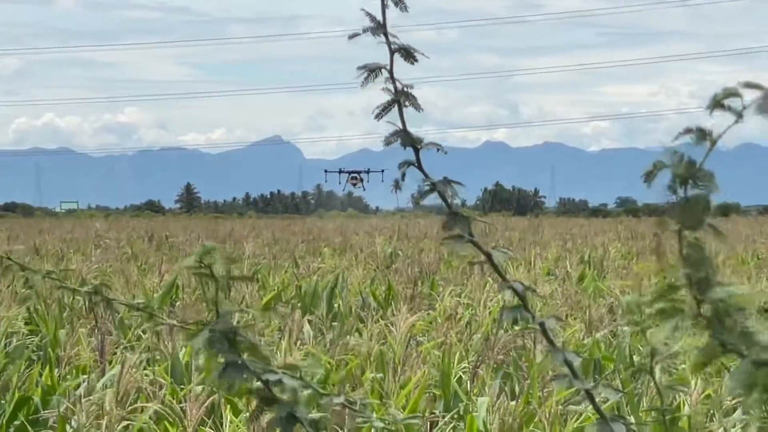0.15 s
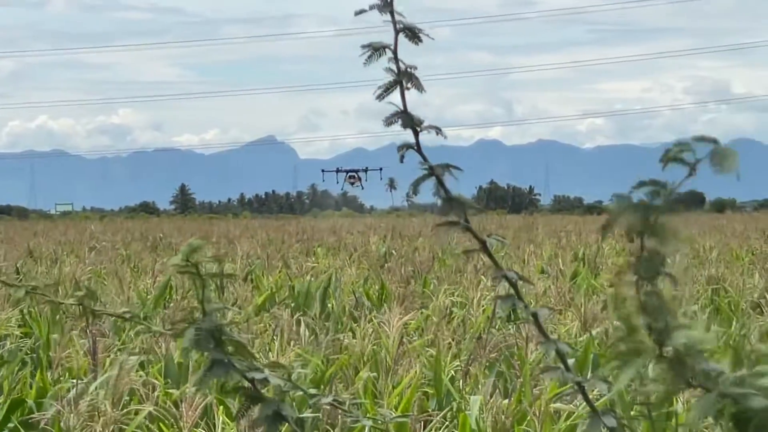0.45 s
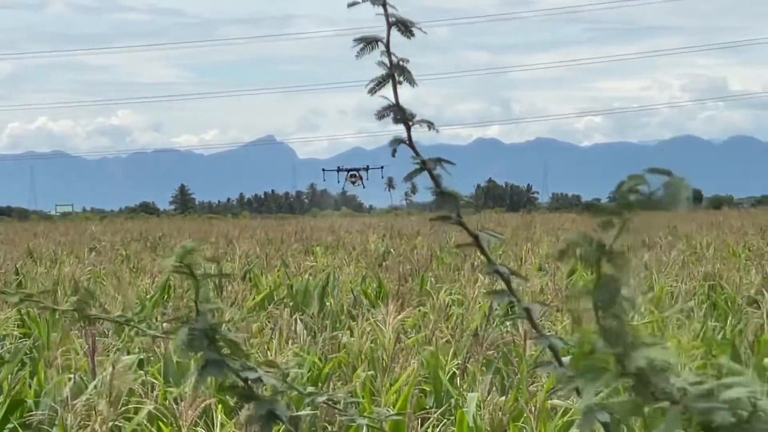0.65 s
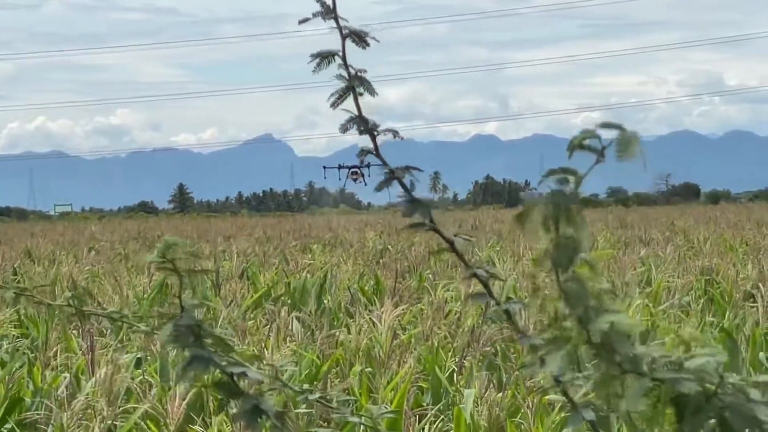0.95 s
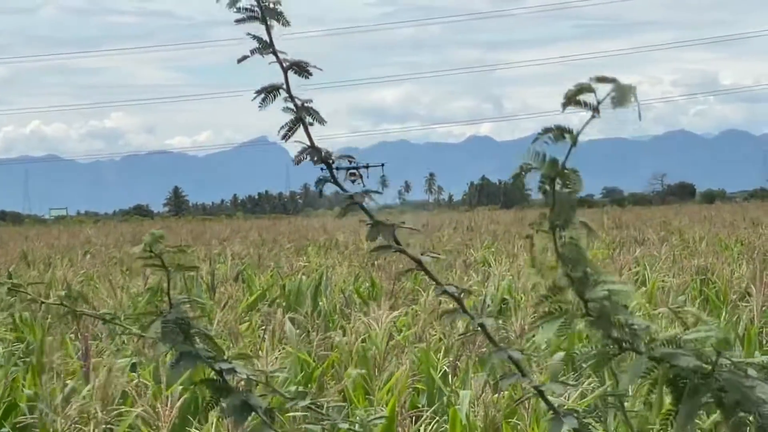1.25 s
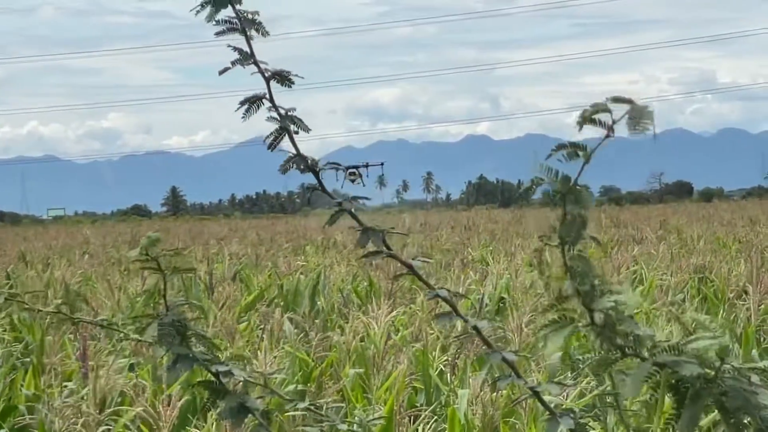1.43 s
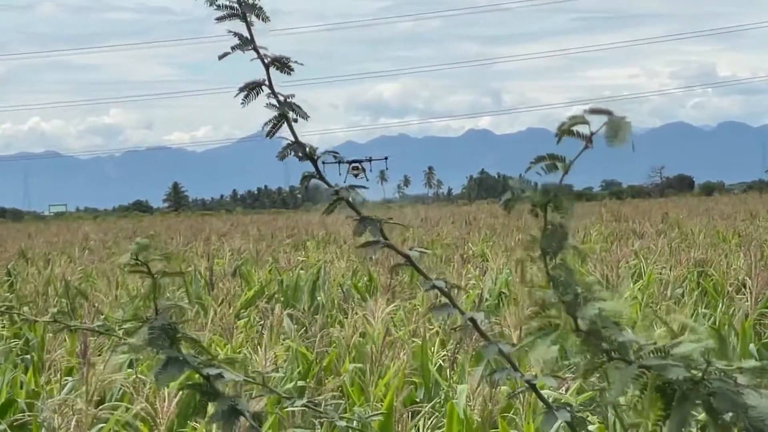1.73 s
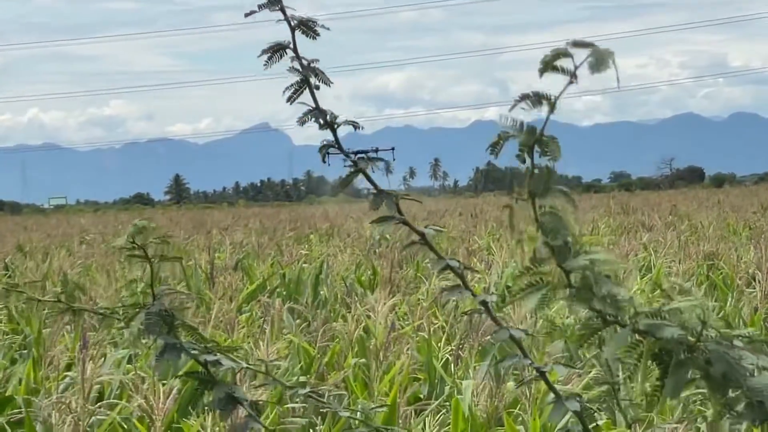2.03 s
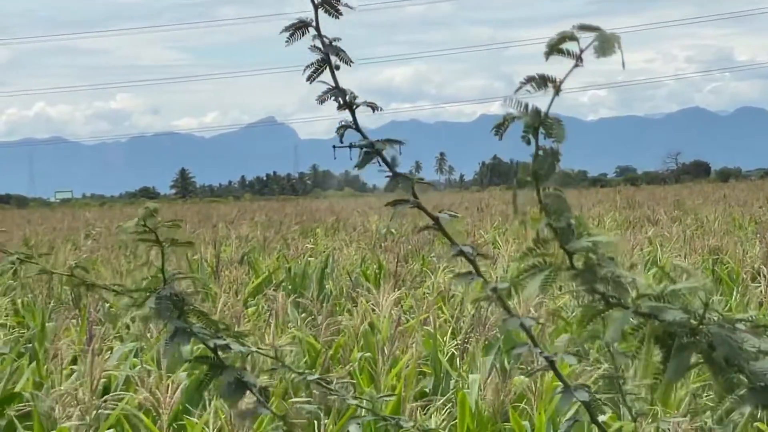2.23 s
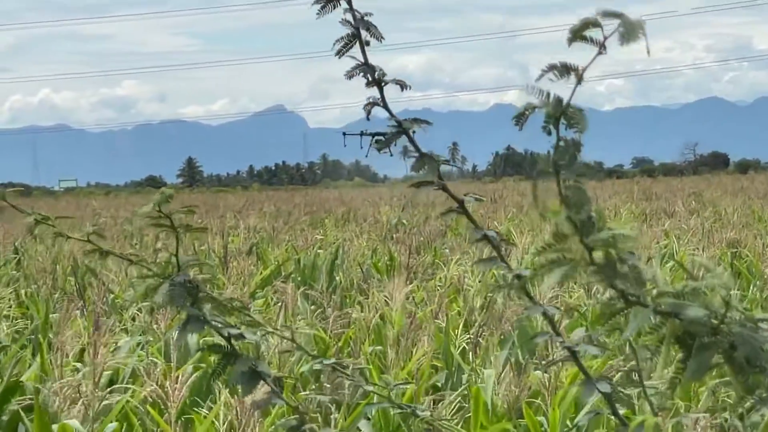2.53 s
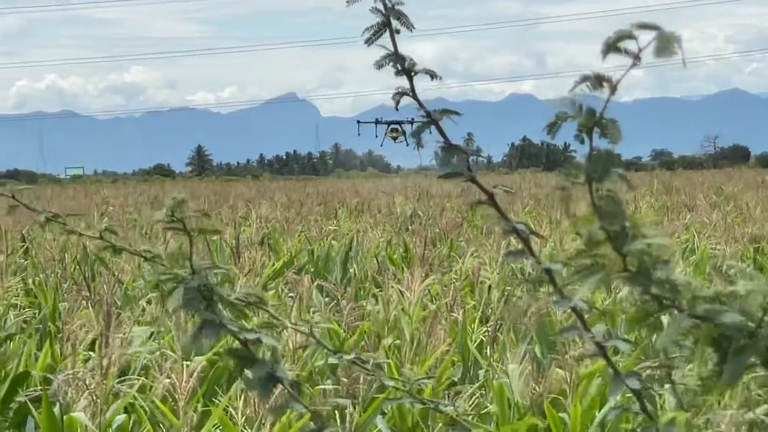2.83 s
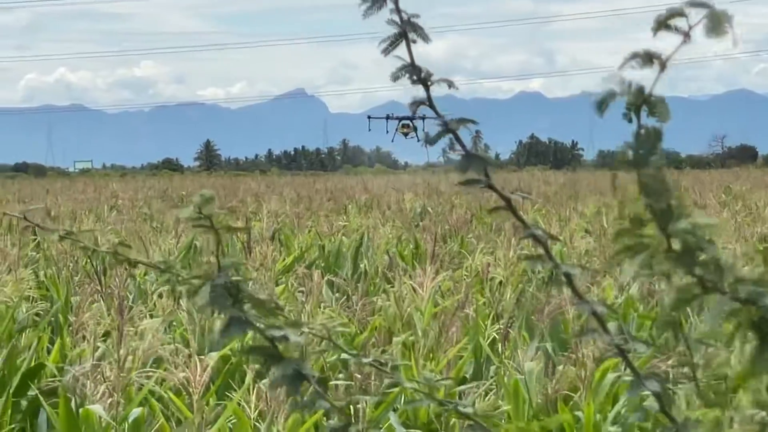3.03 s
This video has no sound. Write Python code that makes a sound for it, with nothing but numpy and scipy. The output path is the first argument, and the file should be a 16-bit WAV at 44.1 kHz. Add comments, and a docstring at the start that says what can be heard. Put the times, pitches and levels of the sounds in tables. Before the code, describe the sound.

A three-cylinder diesel, probably a tractor, idles steadily nearby with hum, chuffs and knocks; wind thumps the microphone, then drops. Faint bird slurs come early, over hissing crop leaves and soft distant drone wash outdoors.

```python
"""Idling diesel at the edge of a crop field

A spraying drone hovers far off, a soft rotor wash of fluttering low noise; the crop's leaves hiss.
A small bird calls faintly in gliding tones, and bursts of low noise buffet the microphone, then drop.
Nearby a three-cylinder diesel, probably a tractor, idles: noise that partly repeats with each engine
cycle and steady tones make its hum, uneven chuffs, clatter and knocks."""
import sys
import numpy as np
from scipy import signal
from scipy.fft import rfft, irfft
from scipy.io import wavfile
from scipy.ndimage import uniform_filter1d

SR = 44100
rng = np.random.default_rng(int(sys.argv[2]) if len(sys.argv) > 2 else 0)


def unload_wav(signal):
    """Save mono or channel-first audio to the path in sys.argv[1] as 16-bit WAV at rate SR, clipped to [-1, 1]."""
    wavfile.write(
        sys.argv[1],
        SR,
        np.round(np.clip(np.atleast_2d(signal).T, -1, 1) * 32767).astype(np.int16),
    )


N = 140238

CYCLE_HZ = 5.096  # engine cycles a second; each of the three cylinders fires once a cycle
EXHAUST_REPEATS = 0.4  # share of the puff and knock noise power that returns every cycle


def from_db(db):
    """Decibels to gain."""
    return 10 ** (np.asarray(db) / 20)


def rms_one(x):
    """Scale to rms 1."""
    return x / np.sqrt(np.mean(x ** 2) + 1e-20)


def seconds():
    """Time of every sample."""
    return np.arange(N) / SR


def in_time(rows):
    """A curve joined by straight lines."""
    return np.interp(seconds(), *np.transpose(rows))


def bins():
    """Frequency of every spectral bin [Hz], at least 1 so that its logarithm exists."""
    return np.maximum(np.arange(N // 2 + 1) * SR / N, 1)


def at_hz(points, hz):
    """Read a table on a log-frequency axis."""
    f, value = np.transpose(points)
    return np.interp(np.log(hz), np.log(f), value)


def colour(x, spectrum, centre_hz=1):
    """Give noise a spectrum; rms 1."""
    gain = from_db(at_hz(spectrum, bins() / centre_hz))
    return rms_one(irfft(rfft(x) * gain, N))


def stereo_noise(likeness):
    """White noise, partly shared by both channels; the likeness may vary with frequency."""
    mid, side = rfft(rng.standard_normal((2, N)))
    c = np.clip(likeness, 0, 1)
    return irfft(np.sqrt(1 + c) * mid + np.sqrt(1 - c) * side * [[1], [-1]], N)


def cyclic_noise(repeats):
    """White noise of which a share of the power comes back with every engine cycle."""
    share = np.clip(repeats, 0, 1)
    one_cycle = rng.standard_normal(int(SR / CYCLE_HZ))
    fresh = rng.standard_normal(N)
    return np.sqrt(share) * np.resize(one_cycle, N) + np.sqrt(1 - share) * fresh


def even(x, span_s):
    """Noise with its chance swells evened out."""
    power = np.mean(np.atleast_2d(x) ** 2, axis=0)
    width = max(int(span_s * SR), 2)
    smooth_power = uniform_filter1d(uniform_filter1d(power, width), width)
    return x / np.sqrt(smooth_power + 1e-12)


def flicker(count):
    """A random wobble with so many turns a second; rms 1."""
    turns = rng.standard_normal(int(count * N / SR) + 2)
    return rms_one(np.interp(seconds() * count, np.arange(len(turns)), turns))


def resonate(x, hz, width_hz):
    """One resonance, a pole pair whose radius sets the ringing; rms 1."""
    r = np.exp(-np.pi * width_hz / SR)
    poles = [1, -2 * r * np.cos(2 * np.pi * hz / SR), r * r]
    return rms_one(signal.lfilter([1, 0, -1], poles, x))


def stroke(start_s, rate, attack_s, hold_s, decay_s):
    """A repeating attack, hold and decay, with the tail of the stroke before."""
    age = (seconds() - start_s) % (1 / rate)

    def shape(a):
        return np.minimum(a / attack_s, 1) * np.exp(-np.maximum(a - hold_s, 0) / decay_s)

    return np.hypot(shape(age), shape(age + 1 / rate))


def rotor_wash():
    """The drone is so far off that only a soft, fluttering rush remains."""
    # far rotor rush: (frequency [Hz], relative density [dB])
    wash_spectrum = [(30, -17), (60, -8.5), (110, 1.5), (220, 2), (330, -8), (460, -7), (700, -20),
                     (1200, -25.5), (2000, -31.5), (4000, -47.5), (10000, -116)]
    level_db, flutter_db = -35, 0.9
    flutter = flutter_db * (flicker(count=9) + flicker(count=35))
    return from_db(level_db + flutter) * colour(stereo_noise(likeness=0.72), wash_spectrum)


def leaves():
    """The crop hisses in the breeze: bright noise with a flickering level."""
    # leaf hiss: (frequency [Hz], relative density [dB])
    leaf_spectrum = [(400, -33), (1000, 8), (1700, 7), (2300, 2), (3700, 0.5), (4400, -3.5), (6200, -6),
                     (8000, -5), (9700, -3.5), (11000, -2), (11700, -18.5)]
    # mean loudness of the hiss: (time [s], level [dB])
    leaf_level = [(0, -50.5), (.7, -53), (1.4, -52), (2.4, -51.5), (2.9, -51), (3.18, -50)]
    # how alike the hiss starts out left and right: (frequency [Hz], likeness [0 to 1])
    leaf_likeness = [(700, 0.41), (1700, 0.71), (2200, 0.64), (3200, 0.84), (4600, 0.99), (5400, 1)]
    flicker_db = 0.69
    level_db = in_time(leaf_level) + flicker_db * (flicker(count=8) + flicker(count=30))
    return from_db(level_db) * colour(stereo_noise(at_hz(leaf_likeness, bins())), leaf_spectrum)


def bird():
    """Thin, quick slurs gliding in pitch, with a little scattering in the crop."""
    # slurs: (start [s], length [s], first pitch [Hz], last pitch [Hz], level before the trim [dB])
    slurs = [(.325, .04, 3950, 4300, -59), (.362, .026, 4950, 4300, -58), (.415, .075, 4200, 5600, -59.5),
             (.482, .03, 5750, 6550, -55.5), (.665, .028, 4020, 4280, -61), (.697, .024, 4850, 4330, -57),
             (.765, .085, 4500, 6350, -60), (.99, .05, 3850, 4250, -58.5), (1.042, .025, 4950, 4400, -59),
             (1.105, .09, 4250, 6400, -61), (1.455, .055, 4920, 5150, -58), (1.495, .04, 5700, 6400, -60.5),
             (1.525, .025, 5050, 4900, -60)]
    trim_db, scatter_decay_s, scatter_db = -6.5, 0.009, -1
    direct = np.zeros(N)
    for start_s, length_s, from_hz, to_hz, db in slurs:
        u = np.clip((seconds() - start_s) / length_s, 0, 1)  # progress through the slur
        swell = np.sqrt(8 * u * (1 - u))  # silent at both ends
        pitch_hz = from_hz * (to_hz / from_hz) ** u
        direct += from_db(db) * swell * np.sin(2 * np.pi * np.cumsum(pitch_hz) / SR)
    scatter = rng.standard_normal(N) * np.exp(-seconds() / scatter_decay_s)
    scattered = signal.fftconvolve(direct, scatter / np.linalg.norm(scatter))[:N]
    return from_db(trim_db) * (direct + from_db(scatter_db) * scattered)


def wind():
    """Low turbulence on the microphone, with short buffets on top."""
    # underlying wind: (time [s], level [dB])
    wind_level = [(0, -20.5), (.15, -33), (.38, -28.5), (.55, -29), (.8, -26.5), (1.05, -29), (1.3, -28.5),
                  (1.45, -22.5), (1.7, -28.5), (1.9, -24.5), (2.0, -27.5), (2.2, -33.5), (2.35, -42),
                  (2.6, -48), (2.88, -44), (3.0, -39), (3.18, -42)]
    # its rumble: (frequency [Hz], relative density [dB])
    rumble_spectrum = [(15, -35), (25, -26), (40, -6), (55, 3), (75, 6.5), (95, -3.5), (125, -1.5),
                       (190, -8.5), (280, -19), (450, -34.5), (800, -51.5), (2000, -71), (8000, -100)]
    # single buffets: (peak time [s], peak level [dB], Gaussian half length [s], centre frequency [Hz])
    buffets = [(0.185, -19.5, 0.02, 73), (0.261, -26, 0.0064, 190), (0.287, -18.5, 0.029, 65),
               (0.47, -18.5, 0.0069, 82.3), (0.538, -22.5, 0.02, 100), (0.601, -20, 0.011, 99.3),
               (1.366, -22, 0.014, 102), (1.391, -15.5, 0.017, 77.5), (1.469, -15, 0.0081, 87),
               (1.494, -14, 0.0074, 77.5), (1.536, -19, 0.027, 69.4), (1.638, -14, 0.0086, 75.5),
               (1.743, -27.5, 0.0049, 308), (1.761, -17, 0.011, 53.3), (1.788, -28, 0.019, 174),
               (1.827, -23.5, 0.0052, 296), (2.075, -16, 0.02, 83), (2.088, -23.5, 0.0057, 292),
               (2.14, -19.5, 0.011, 91), (2.233, -28.5, 0.03, 175), (2.724, -31, 0.015, 207.5),
               (3.022, -34, 0.046, 103)]
    # spectrum of a buffet: (share of its centre frequency [1], relative density [dB])
    buffet_shape = [(.2, -39), (.5, -19.5), (.8, 6), (1.2, 4.5), (2, -17), (4, -29), (8, -59), (25, -72),
                    (100, -110)]
    likeness, pan_db = 0.96, 0.12  # pan: left up, right down
    rumble = even(colour(stereo_noise(likeness), rumble_spectrum), span_s=0.075)
    out = from_db(in_time(wind_level)) * rumble
    for peak_s, db, half_s, hz in buffets:
        eddy = even(colour(stereo_noise(likeness), buffet_shape, hz), span_s=0.016)
        swell = np.exp(-.5 * ((seconds() - peak_s) / half_s) ** 2)
        out = out + from_db(db) * eddy * swell
    return out * from_db(pan_db * np.array([[1], [-1]]))


def knocks():
    """Short injector knocks ring in the cylinder head, a doubled resonance."""
    # injector knocks: (time into the cycle [s], level [dB])
    knock_times = [(.008, -54), (.051, -52.5), (.089, -56), (.129, -54), (.149, -54.5), (.180, -69)]
    ring_hz, width_hz = 2150, 530
    attack_s, hold_s, decay_s = 0.0011, 0.0035, 0.0052
    level = sum(from_db(db) * stroke(s, CYCLE_HZ, attack_s, hold_s, decay_s) for s, db in knock_times)
    once = resonate(cyclic_noise(EXHAUST_REPEATS), ring_hz, width_hz)
    return level * resonate(once, ring_hz, width_hz)


def clatter():
    """The valves clatter in bright, grainy noise strokes, two per firing."""
    # valve strokes: (time into the cycle [s], level [dB])
    taps = [(0.015, -51), (0.052, -52.5), (.087, -59), (.116, -52), (.149, -52), (0.18, -52.5)]
    # valve clatter: (frequency [Hz], relative density [dB])
    clatter_spectrum = [(600, 7), (1300, 5.5), (1850, -2), (2050, 7), (2600, 4), (2950, 2.5), (3600, 5.5),
                        (4500, -1), (6500, -2.5), (8500, -4.5), (12000, -11.5)]
    attack_s, hold_s, decay_s = 0.0016, 0.008, 0.037
    grain_db = 1.3
    power = sum((from_db(db) * stroke(s, CYCLE_HZ, attack_s, hold_s, decay_s)) ** 2 for s, db in taps)
    grain = cyclic_noise(repeats=0.013) * from_db(grain_db * flicker(count=400))
    return np.sqrt(power) * colour(grain, clatter_spectrum)


def engine_hum():
    """The block drones as noise shaped by block and silencer, with clean orders standing out."""
    # engine block and silencer: (frequency [Hz], relative density [dB])
    body_spectrum = [(40, 5), (70, 1), (130, -1.5), (200, 2), (260, -3), (320, 0.5), (400, -1), (470, -2),
                     (560, -17), (670, -9), (800, -30.5), (1100, -10.5), (2000, -56)]
    # clean engine orders: (multiple of the cycle rate [1], level before the trim [dB])
    orders = [(18, -41), (39, -45), (45, -48), (51, -50), (60, -52), (72, -51), (78, -51), (90, -55),
              (130, -61)]
    body_db, orders_trim_db = -40.5, -3.5
    tones = 0
    for multiple, db in orders:
        turns = multiple * CYCLE_HZ * seconds() + rng.random()
        tones = tones + from_db(db) * np.sqrt(2) * np.sin(2 * np.pi * turns)
    drone = even(colour(cyclic_noise(repeats=0.51), body_spectrum), span_s=0.04)
    return from_db(body_db) * drone + from_db(orders_trim_db) * tones


def chuffs():
    """Each cylinder blows a puff that rings in the pipe at an unsteady pitch; a reflection blurs its tail."""
    # one exhaust chuff per cylinder and cycle:
    # (time into the cycle [s], ring level [dB], puff level [dB], ring pitch [Hz], hold [s], decay [s])
    cylinders = [(0.054, -42.5, -42, 1186, 0.015, 0.0054), (0.114, -42, -43, 1139, 0.016, 0.0092),
                 (0.180, -46.5, -44.5, 1217, 0.02, 0.0097)]
    # the breathy part of a chuff: (frequency [Hz], relative density [dB])
    puff_spectrum = [(200, -8), (400, 12), (650, 6.5), (900, 2.5), (1400, -31), (1750, -19), (2300, -6.5),
                     (3000, -16), (6000, -69), (12000, -60)]
    attack_s, wander_hz, spread_db = 0.0025, 95, 1.0
    echo_s, echo_db = 0.0164, -9.5
    out = 0
    for start_s, ring_db, puff_db, hz, hold_s, decay_s in cylinders:
        for late_s, db in ((0, 0), (echo_s, echo_db)):
            pitch_hz = hz + wander_hz * flicker(count=400)
            turns = np.cumsum(pitch_hz) / SR + rng.random()
            ring = np.sqrt(2) * np.sin(2 * np.pi * turns)
            puff = even(colour(cyclic_noise(EXHAUST_REPEATS), puff_spectrum), span_s=0.0027)
            blow = from_db(ring_db + db) * ring + from_db(puff_db + db) * puff
            out = out + blow * stroke(start_s + late_s, CYCLE_HZ, attack_s, hold_s, decay_s)
    return out * from_db(spread_db * flicker(count=15))  # uneven loudness


def stereo_image(x):
    """Left-right phase and level vary with frequency; the turn near 10 kHz is from stereo processing."""
    # phase between the channels: (frequency [Hz], left lead [rad])
    channel_phase = [(50, 0), (300, .3), (650, 1.0), (1100, 1.7), (1300, 1.65), (1640, 2.6), (1900, 5.3),
                     (2400, 6.15), (2800, 7.05), (3300, 6.9), (3600, 6.6), (5300, 6.283), (8850, 6.283),
                     (9150, 4.95), (10250, 3.14), (11000, 1.95), (11700, 0)]
    # balance between the channels: (frequency [Hz], left minus right [dB])
    channel_balance = [(100, 1), (400, 3.5), (660, -2.5), (1100, -2), (1300, -6), (1650, 6), (1900, 2),
                       (2300, -0.5), (2700, -5), (3200, 0.5), (4400, -0.5)]
    lead, pan = at_hz(channel_phase, bins()), at_hz(channel_balance, bins())
    left = from_db(pan / 2)
    right = from_db(-pan / 2) * np.exp(-1j * lead)
    return irfft(rfft(x) * np.array([left, right]), N)


def scene():
    """Engine, leaves and bird share one stereo image; the drone is far off, wind at the microphone."""
    engine = chuffs() + engine_hum() + clatter() + knocks()
    return rotor_wash() + wind() + stereo_image(engine + leaves() + bird())


def record(dry):
    """The deepest bass is cut gently and the top steeply."""
    low_cut = signal.butter(2, 38, "high", fs=SR, output="sos")  # Hz
    top_cut = signal.ellip(10, .1, 80, 11600, fs=SR, output="sos")  # ripple dB, stop dB, Hz
    dry = signal.sosfiltfilt(low_cut, dry, padtype="even")
    return signal.sosfilt(top_cut, dry)


dry = scene()
out = record(dry)
unload_wav(out)
```